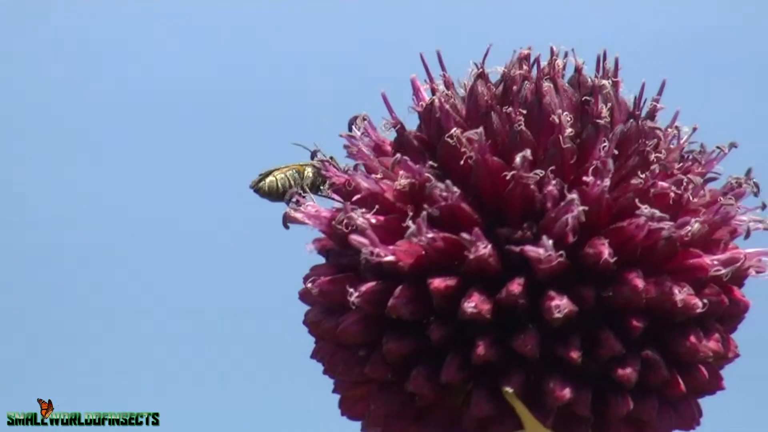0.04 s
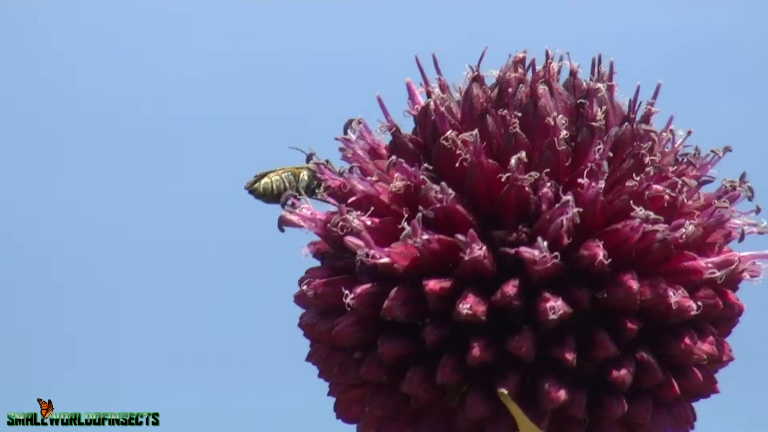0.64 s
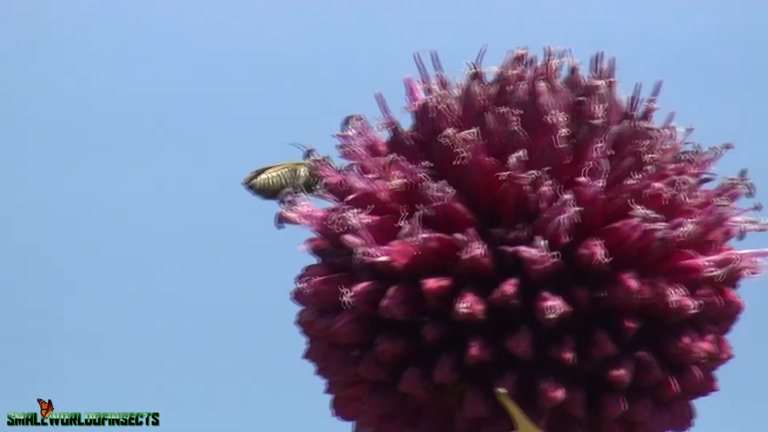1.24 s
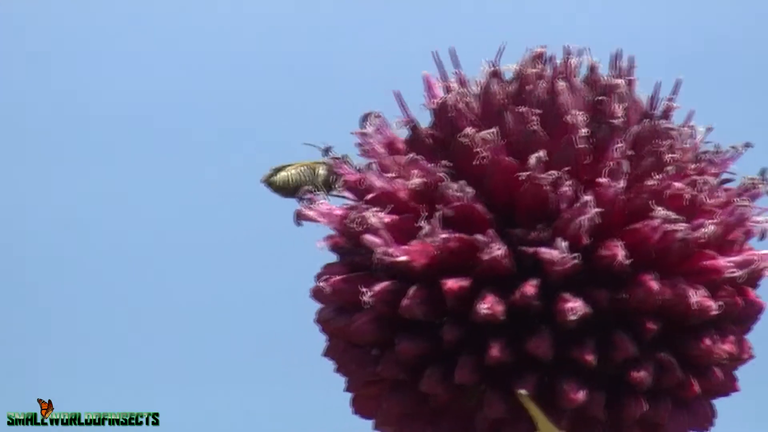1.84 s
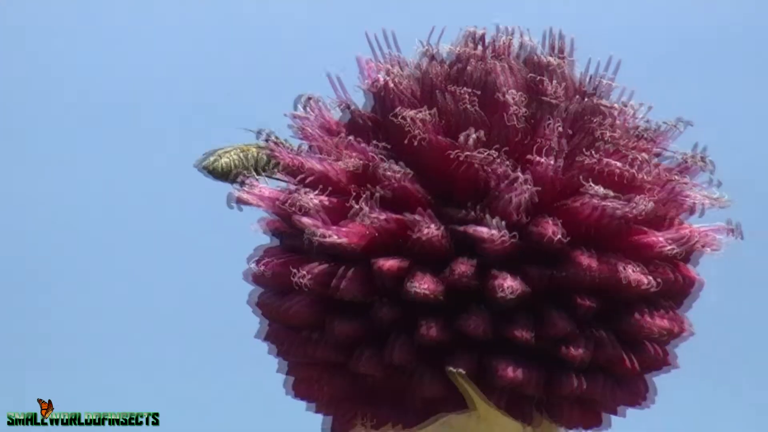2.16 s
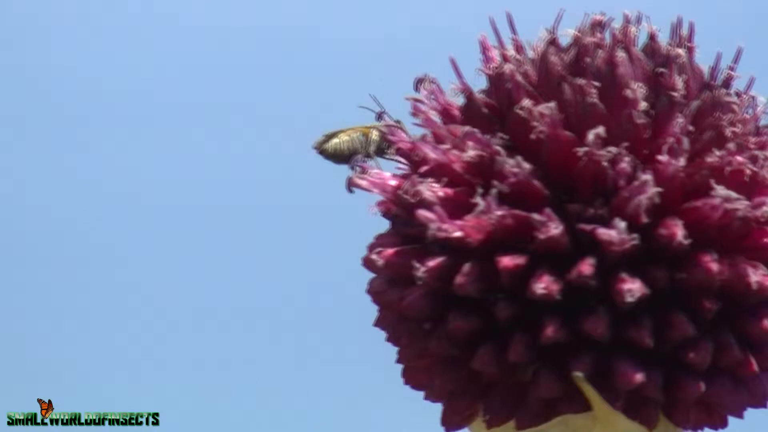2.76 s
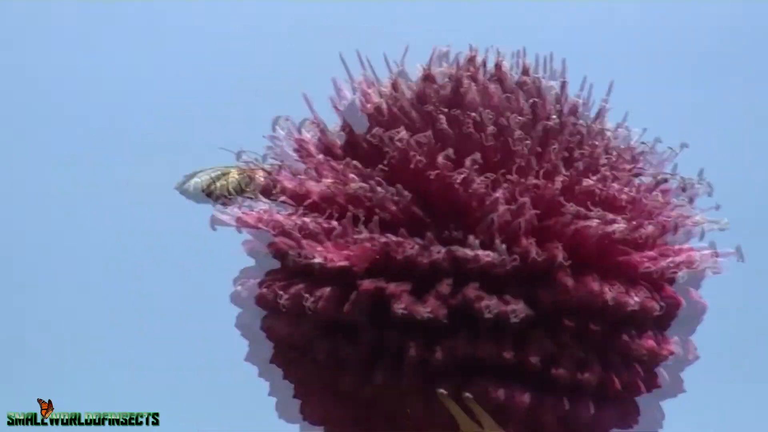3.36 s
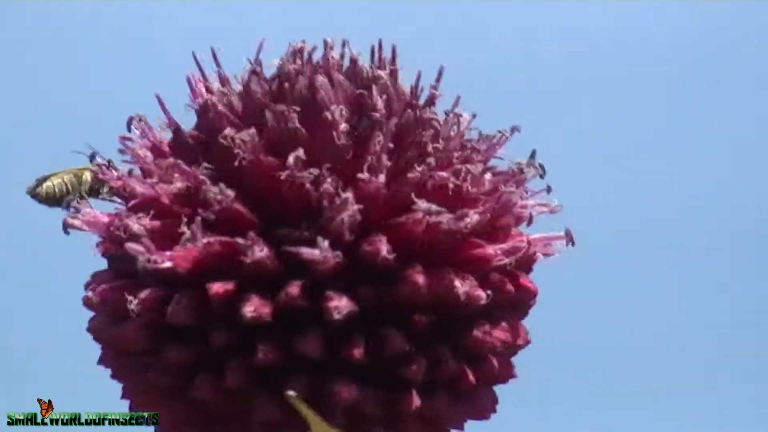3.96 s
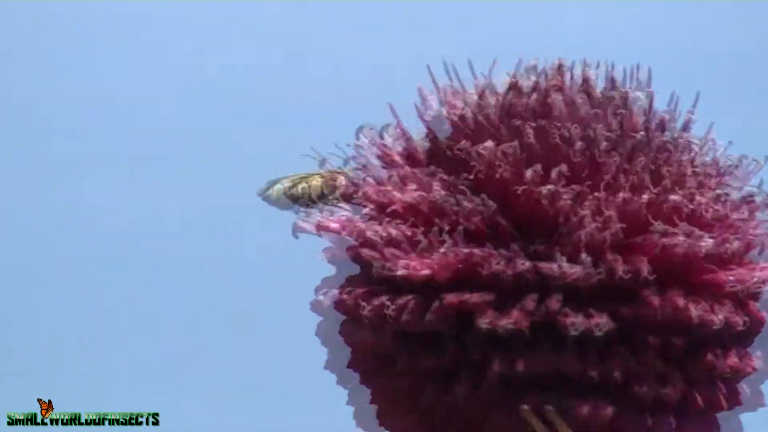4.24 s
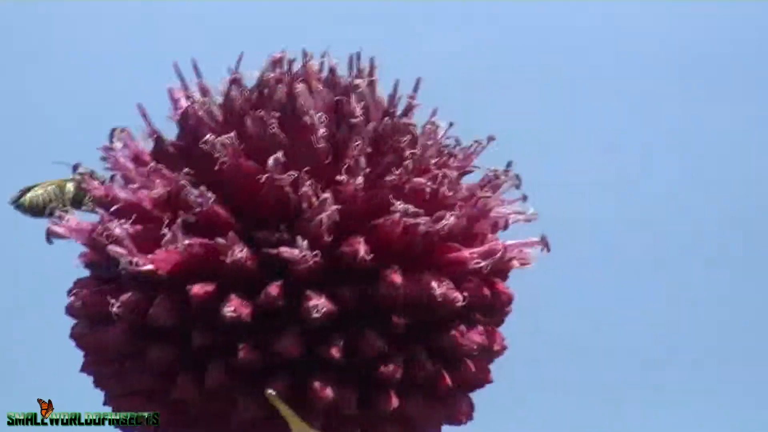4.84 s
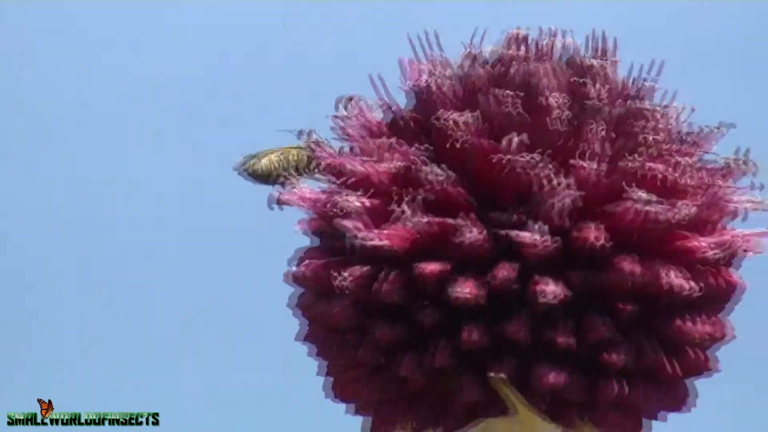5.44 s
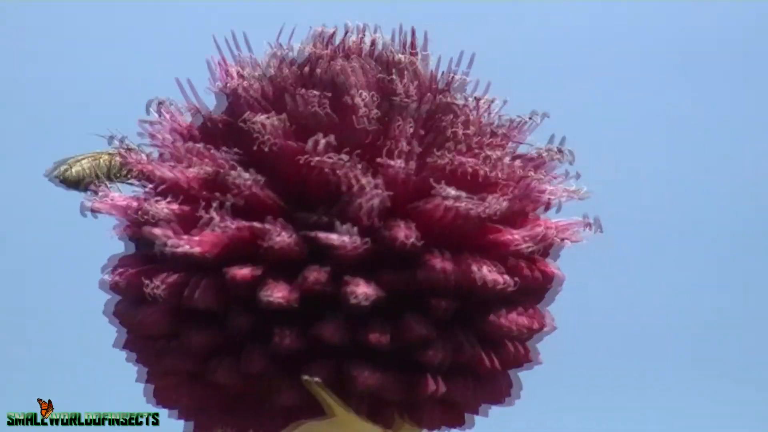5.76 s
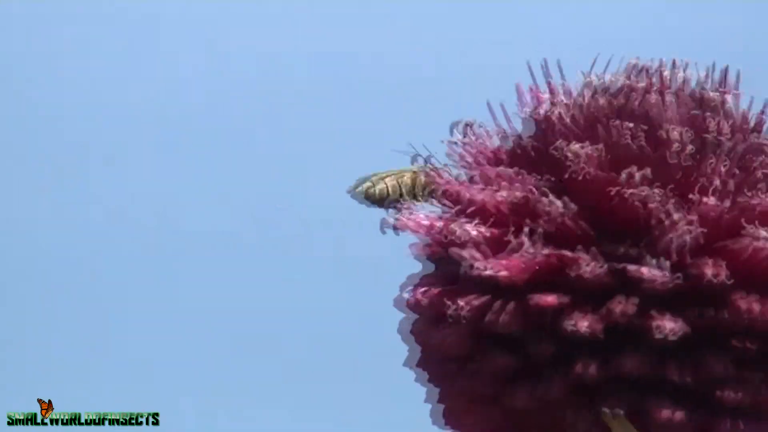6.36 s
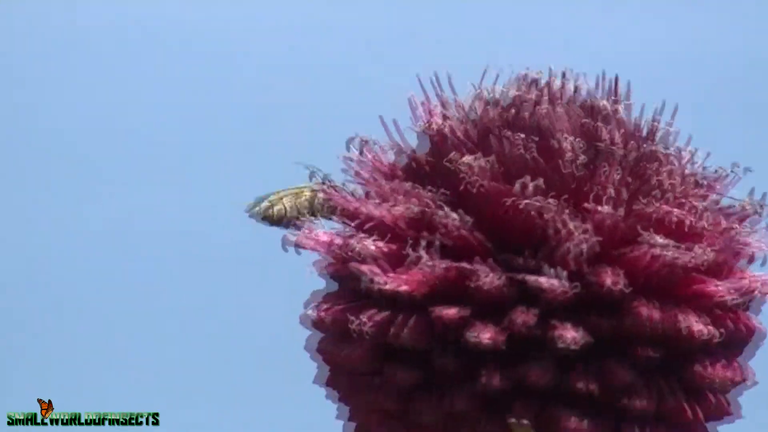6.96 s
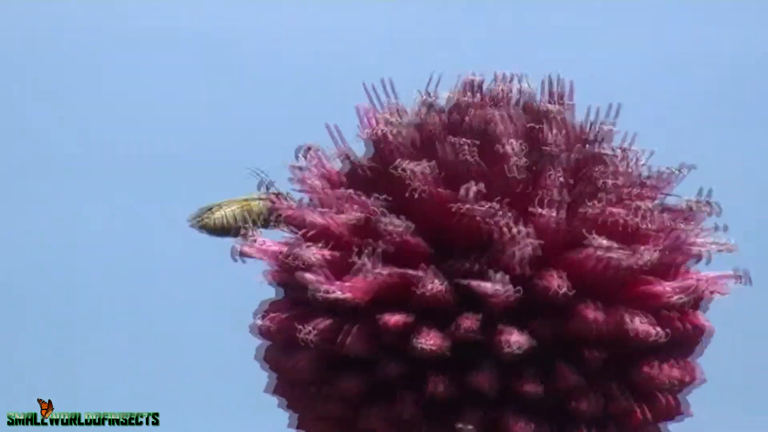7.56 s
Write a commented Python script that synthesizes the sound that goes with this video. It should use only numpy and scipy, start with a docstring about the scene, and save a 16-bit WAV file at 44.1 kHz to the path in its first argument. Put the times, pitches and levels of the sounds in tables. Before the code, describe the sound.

A camcorder's motor hums and ticks outdoors, soft wind rumbles on the microphone, then fingers knock and click sharply on the plastic body.

```python
"""Outdoors in a light breeze, on a tape camcorder's built-in stereo microphone, inches from its works.
The lens motor ticks for the first second; drive, hum and a thin whine run throughout, and leaves stir
faintly to the right. From 3 s gusts rumble on the two microphone ports, and at 5.3 s a small part snaps.
From 6.2 s fingers knock the body and click on the shell, loudest twice just after 7 s."""
import sys
import numpy as np
from scipy import signal
from scipy.fft import rfft, irfft, next_fast_len
from scipy.io import wavfile
from scipy.ndimage import uniform_filter1d

SR = 44100
rng = np.random.default_rng(int(sys.argv[2]) if len(sys.argv) > 2 else 0)


def master(y):
    """Save y as 16-bit WAV."""
    cut = np.clip(np.atleast_2d(y).T, -1, 1)
    pcm = np.round(cut * 32767)  # scale
    wavfile.write(sys.argv[1], SR, pcm.astype(np.int16))


N = 340011
T = np.arange(N) / SR
FFT_SIZE = next_fast_len(N + 8192)
F = np.maximum(np.arange(FFT_SIZE // 2 + 1) * SR / FFT_SIZE, 1e-3)

# Table levels are relative. pan_db is left minus right; lead_rad is the left port's phase lead.
# spectrum of the open air: frequency_hz, level_db
AIR_SPECTRUM = [(15, -47), (25, -12), (96, -1), (143, -4), (284, -5), (444, -10), (632, -22), (1090, -15.5),
                (1620, -21), (2010, -25), (2260, -19), (2930, -24.5), (7000, -32.5), (9100, -50),
                (15400, -120)]
# that air between the two ports: frequency_hz, pan_db, correlation
AIR_STEREO = [(40, -6, 0.51), (130, -7.5, 0.86), (273, -6.5, 0.79), (444, 1.5, -0.54), (1100, 0.5, -0.76),
              (2000, 11, 0.16), (3500, 0, -0.052), (12000, -8, 0.52)]
# leaves stirring: peak_s, level_db, rise_s, fall_s
RUSTLES = [(.1, -68, 0.17, 0.61), (1.02, -64, 0.056, 0.1), (1.36, -61, 0.054, 0.063),
           (1.6, -66.5, 0.42, 0.72), (6.37, -67, 0.074, 0.062)]
# wind rumble on the ports: frequency_hz, level_db
WIND_SPECTRUM = [(13, -36), (22, -8.5), (86, -3), (112, -6.5), (135, -2.5), (176, -10), (294, -14.5),
                 (332, -20.5), (520, -24), (680, -51), (1140, -120)]
# gusts: peak_s, level_db, rise_s, fall_s
GUSTS = [(3.11, -44, 0.031, .05), (3.197, -35, 0.019, 0.013), (3.28, -44, 0.038, 0.082),
         (3.75, -44.5, 0.041, 0.14), (4.12, -45, 0.069, 0.19), (4.4, -42, 0.02, .025),
         (5.14, -52, 0.048, 0.07), (5.33, -42, 0.12, 0.087), (5.44, -37.5, 0.061, 0.032),
         (5.51, -36, 0.032, 0.025), (5.615, -40.5, 0.035, 0.042), (5.78, -47, .08, .08),
         (6.21, -42.5, 0.047, 0.025), (6.29, -40, 0.036, 0.025), (6.332, -39, .008, 0.015),
         (6.51, -45.5, 0.11, 0.037), (6.73, -46.5, 0.073, 0.16), (7.12, -46.5, 0.11, 0.13)]
# swell and sag of the motor hum: time_s, level_db
HUM_LEVELS = [(.08, -75), (.24, -58.5), (.4, -62), (.77, -49.5), (1.07, -58), (1.28, -51.5), (1.58, -51),
              (1.95, -59.5), (2.3, -58), (2.66, -50), (3.0, -58.5), (3.4, -67), (3.65, -53), (4.5, -61.5),
              (4.9, -50), (5.75, -55), (7.48, -52.5), (7.71, -61)]
# partials of the hum: pitch_ratio, level_db
HUM_PARTIALS = [(1, 12), (2.004, -31), (3.33, -19)]
# housing resonances shaken by the tape drive: pitch_hz, width_hz, level_db, pan_db, lead_rad
HOUSING_MODES = [(176.6, 50, 1, -10, 1.36), (283.5, 38, -5, -13.5, 1.5), (591.6, 106, -5.5, -10, 1.65),
                 (672.4, 128, -5.5, -11, 2), (1308, 52, -12, -7.5, 4), (1609, 155, -14, -8, 0.9),
                 (2182, 73, -20.5, -18, 2), (2239, 72, -9, -9.5, 1.7), (2430, 59, -19, 22, 1.5),
                 (2572, 12.8, -3, -2.5, -1), (3260, 91, -17, 1, 2), (4930, 680, -24.5, -3, 3)]
# resonances of the plastic shell: pitch_hz, width_hz, level_db, pan_db, lead_rad
SHELL_MODES = [(437, 32, 9.5, -2, 1.44), (515, 134, 4, -10.5, 2), (645, 82, 4.5, -10, 7),
               (682, 88, 0.5, -7, 2), (844.4, 27, 8.5, -12, -2.5), (980, 21, -3.5, -7, -11),
               (1200, 18, -6.5, -3, 8), (1313, 107, 0, -0.5, 0.5), (1489, 132, -9.5, 28, 3),
               (1500, 71, -7, 20.5, -6), (1760, 95, -10, -2, -8.5), (2300, 67, -0.5, 4.5, 4),
               (2580, 70, -14.5, 18, 5), (2627, 130, -8, 10, 1), (3300, 360, -20, 23, -0.5),
               (3930, 830, -24, -1, 1.5)]
# resonances of the whole body on its mount: pitch_hz, width_hz, level_db, pan_db, lead_rad
BODY_MODES = [(183, 52, -1, 24.5, 2.5), (240, 52, 1.5, -8, 5), (406, 56, 0.5, -12.5, 3.5),
              (560, 78, -9.5, -7.5, 4), (631, 40, -5.5, 4, 5), (806, 46, -10.5, -11, -3.2),
              (992, 84, -14.5, -19, -6), (1200, 89, -9.5, -10, 4.5), (1300, 65, -18, -11, 4.5),
              (1710, 170, -23, -5, -2), (2060, 44, -14, 4, -3.5), (2670, 150, -13, 11, 3.5)]
# resonances of the small part that snaps: pitch_hz, width_hz, level_db, pan_db, lead_rad
SNAP_MODES = [(1050, 50, 10, -5, 8), (1580, 240, 1.5, 6, 1.5), (2350, 120, 7, 12, 2),
              (3040, 280, 7, 4, 1.5), (4300, 340, 8.5, -5, 3), (4950, 230, -3, -3, 0.5),
              (6200, 400, 4, -2.5, 3.5), (7830, 550, 0, -10, 0.5), (9800, 260, -10, -8, 3)]
# squeak as the lens motor runs up: time_s, level_db
SQUEAK_LEVELS = [(0, -83), (.03, -71), (.11, -72), (.15, -93)]
# lens motor steps, one a frame, mostly hard and soft in turn: start_s, level_db, brightness_hz
LENS_STEPS = [(.002, -26, 3200), (0.0438, -28.5, 1200), (0.0811, -26.5, 2800), (.123, -23.5, 3180),
              (0.162, -31.5, 1600), (.2031, -22, 4500), (0.2426, -31.5, 2000), (0.2821, -24.5, 4180),
              (0.3233, -29.5, 1000), (0.3623, -23.5, 4000), (0.4047, -33, 1200), (0.445, -31.5, 1900),
              (0.4824, -25, 2300), (0.524, -30.5, 2200), (0.5617, -26, 3800), (0.6032, -28, 1700),
              (0.6416, -25.5, 3200), (.685, -28.5, 1400), (.7219, -26.5, 3200), (0.7626, -23, 4000),
              (.8012, -32, 1800)]
# finger clicks: start_s, crack_db, low_hz, high_hz, t60_s, pan_db, shell_db,
# lower_ping_hz, lower_ping_db, upper_ping_hz, upper_ping_db, ping_pan_db
CLICKS = [(0.778, -50, 2150, 3100, 0.017, 9, -64, 2300, -43, 2800, -35, 8),
          (0.9166, -37, 1200, 8000, 0.016, -1, -37.5, 2780, -28, 3750, -38, 2),
          (6.8534, -20.5, 1200, 11200, 0.008, -6, -63, 1177, -32, 1800, -38, -7),
          (7.005, -46, 600, 1500, 0.019, -12, -40, 950, -52, 1500, -58, -12),
          (7.023, -41, 2500, 5000, 0.019, -4, -56, 3300, -47, 3700, -52, 0),
          (7.038, -4, 1200, 15400, 0.0088, -1.5, -21.5, 408, -20.5, 2170, -30, -4),
          (7.0415, -25.5, 3000, 13000, 0.014, 5, -47, 2500, -33, 5200, -27.5, -4),
          (7.0445, -27, 596, 4940, 0.024, -8, -22.5, 2290, -26, 3550, -37, 1),
          (7.0655, -38, 1500, 11000, 0.018, -3, -28, 1860, -42, 4230, -48, -3),
          (7.0715, -23, 1100, 7700, 0.012, -5, -38, 410, -26.5, 1820, -34, -6),
          (7.206, -19.5, 2190, 12000, 0.015, -2.5, -27, 1660, -18, 2300, -24, -7)]
# tone colour of the clicks' cracks: frequency_hz, level_db
CRACK_SPECTRUM = [(180, -38), (300, 6), (411, 19), (526, 10), (744, 7.5), (877, 0.5), (1800, -11),
                  (2200, -12), (2700, -14), (3280, -2), (4200, -8.5), (4800, -8.5), (5300, -9), (6790, -12),
                  (9000, -18), (15500, -26)]
# knocks on the body: start_s, level_db, brightness_hz, shell_over_body_db, low_cut_hz
KNOCKS = [(6.228, -32.5, 395, 15, 200), (6.241, -36.5, 400, -15, 240), (6.329, -36.5, 430, 5, 100),
          (6.402, -42.5, 400, -9, 150), (6.739, -36.5, 400, 4.5, 80), (7.038, -22, 750, -11, 200),
          (7.207, -4, 1930, -21.5, 110), (7.536, -15.5, 560, -15.5, 60)]


def undb(db):
    """Decibels to gain."""
    return 10 ** (np.asarray(db) / 20)


def level(x, db):
    """Scale to an rms level."""
    return x * undb(db) / np.sqrt(np.mean(x ** 2))


def curve(rows):
    """Join (time_s, value) rows by straight lines."""
    return np.interp(T, *np.transpose(rows))


def swells(rows, rest_db):
    """Level in dB of bell-shaped swells over a resting level."""
    power = undb(rest_db) ** 2
    for peak_s, db, rise_s, fall_s in rows:
        width_s = np.where(T < peak_s, rise_s, fall_s)
        power = power + undb(db) ** 2 * np.exp(-((T - peak_s) / width_s) ** 2)
    return 10 * np.log10(power)


def walk(rate_hz):
    """Random values held 1 / rate_hz seconds and smoothed twice; rms 1."""
    hold = int(SR / rate_hz)
    steps = np.repeat(rng.standard_normal(N // hold + 1), hold)
    return level(uniform_filter1d(uniform_filter1d(steps, hold), hold)[:N], 0)


def across(rows, column=1):
    """Join one column of a spectrum on a log-frequency axis."""
    rows = np.array(rows, float)
    return np.interp(np.log(F), np.log(rows[:, 0]), rows[:, column])


def shape(x, response):
    """Filter by a frequency response."""
    return irfft(rfft(x, FFT_SIZE) * response, FFT_SIZE)[..., :N]


def noise(response, channels=1):
    """Unrelated noises with one frequency response."""
    return shape(rng.standard_normal((channels, N)), response)


def edge(x, hz, kind, order=2):
    """High-pass or low-pass."""
    return signal.sosfilt(signal.butter(order, min(hz, .45 * SR), kind, fs=SR, output="sos"), x + 1e-18)


def whiten(burst, bins=13):
    """Even out a burst's spectrum, fade it and give it unit energy."""
    spectrum = rfft(burst)
    flat = irfft(spectrum / np.sqrt(uniform_filter1d(np.abs(spectrum) ** 2, bins)), len(burst))
    flat *= np.linspace(1, 0, len(burst))
    return flat / np.linalg.norm(flat)


def ports(pan_db):
    """Gains at the left and right microphone ports."""
    return undb(np.array([[pan_db], [-pan_db]]) / 2)


def mode_ports(pan_db, lead_rad):
    """A resonance reaches each port with its own strength and phase."""
    return ports(pan_db) * np.array([[np.exp(1j * lead_rad)], [1]])


def ring(modes, low_hz, order=3, size=4096):
    """One blow on a set of resonances, heard at both ports; peak 1, rolled off below low_hz."""
    f = np.arange(size // 2 + 1) * SR / size
    response = sum(undb(db) * mode_ports(pan, lead) * hz * width / (hz ** 2 - f ** 2 + 1j * f * width)
                   for hz, width, db, pan, lead in modes)
    blow = edge(irfft(response, size)[:, :size // 2], low_hz, "high", order)
    return blow / np.abs(blow).max()


def disperse(x, hz, relative_width):
    """Bending waves travel at unequal speeds, which smears a blow's first edge."""
    _, poles = signal.iirpeak(hz, 1 / relative_width, fs=SR)
    return signal.lfilter(poles[::-1], poles, x)


def add(out, start_s, sound):
    """Mix a short sound in at a time."""
    i = max(int(start_s * SR), 0)
    out[:, i:i + sound.shape[-1]] += sound[..., :N - i]


def open_air(air_db=-53, air_top_hz=7500, hiss_db=-65, hiss_hz=9000):
    """Open air and microphone hiss; the ports share the air's bass and oppose in its middle."""
    sides = np.array([[1], [-1]])
    gain = undb(across(AIR_SPECTRUM)) * undb(sides * across(AIR_STEREO) / 2)
    correlation = np.clip(across(AIR_STEREO, column=2), -1, 1)
    shared = noise(gain * np.sqrt(1 + correlation))
    opposed = sides * noise(gain * np.sqrt(1 - correlation))
    air = edge(shared + opposed, air_top_hz, "low")
    hiss = edge(noise(1 / (1 + (F / hiss_hz) ** 2), channels=2), 14900, "low", order=10)
    return level(air, air_db) + level(hiss, hiss_db)


def leaves(gain_db=-2, pan_db=-7, flicker_db=3.5):
    """Leaves rustle faintly off to the right."""
    rustle = edge(edge(noise(1, channels=2), 3260, "high"), 3500, "low")
    stir_db = swells(RUSTLES, rest_db=-76) + flicker_db * walk(40)
    return level(rustle, gain_db) * undb(stir_db) * ports(pan_db)


def wind(breeze_from_s=2.9, calm_db=-63.5, breeze_db=-53, strong_db=-44, buffet_db=2.5, eddy_db=-23):
    """After a calm start, gusts buffet the ports with a rumble and shed smaller, brighter eddies."""
    gust_db = swells(GUSTS, np.where(T < breeze_from_s, calm_db, breeze_db))
    force = undb(gust_db - strong_db + buffet_db * walk(28))
    rumble = edge(noise(undb(across(WIND_SPECTRUM)), channels=2), 44, "high", order=3)
    # pressure on one side of the housing is partly suction on the other
    rumble = level(rumble - 0.27 * rumble[::-1], 0)
    eddies = edge(noise(1, channels=2), 500, "low", order=4)
    eddies = level(edge(eddies, 240, "high"), eddy_db)
    return (rumble * force + eddies * force ** 0.99) * undb(strong_db) * ports(pan_db=-5)


def circuit_whine(line_hz=15625, frame_hz=25, line_db=-81, half_db=-71):
    """The picture circuit whines at its line rate and at half of it; the lower tone flips every frame."""
    flip = np.tanh(12 * np.sin(np.pi * frame_hz * T))
    half_tone = flip * np.sin(np.pi * line_hz * T)
    return level(half_tone, half_db) + level(np.sin(2 * np.pi * line_hz * T), line_db)


def motor_hum(pitch_hz=90.6, wander=0.0033, gain_db=-2, pan_db=-12):
    """The motor's low note swells and sags at a nearly steady pitch."""
    phase = 2 * np.pi * np.cumsum(pitch_hz * (1 + wander * walk(12))) / SR
    tone = sum(undb(db) * np.sin(ratio * phase) for ratio, db in HUM_PARTIALS)
    return level(tone, gain_db) * undb(curve(HUM_LEVELS)) * ports(pan_db)


def tape_drive(level_db=-51, flutter_db=1.0, swell_db=0.37):
    """Tape and gears rub unevenly and keep the housing ringing around the microphone."""
    spectrum = np.zeros((2, len(F)), complex)
    for hz, width_hz, mode_db, pan, lead in HOUSING_MODES:
        broad_hz = max(1.5 * width_hz, .06 * hz)
        near = np.abs(F - hz) < 10 * broad_hz
        resonance = 1 / (1 + 1j * (F[near] ** 2 - hz ** 2) / (F[near] * broad_hz)) ** 2
        friction = rng.standard_normal(2 * len(F)).view(complex)[near]
        gain = undb(mode_db) * np.sqrt(width_hz / broad_hz)
        spectrum[:, near] += friction * gain * resonance * mode_ports(pan, lead)
    whirr = level(irfft(spectrum, FFT_SIZE)[:, :N], level_db)
    return whirr * undb(flutter_db * walk(30) + swell_db * walk(4.83))


def lens_squeak(pitch_hz=9300, width_hz=650, pan_db=-9):
    """The lens gears sing briefly in a narrow high band."""
    band = noise(1 / (1 + ((F - pitch_hz) / width_hz) ** 2))
    return level(band, 0) * undb(curve(SQUEAK_LEVELS)) * ports(pan_db)


def lens_motor(gain_db=2, grit_db=-6.5, grit_t60_s=0.058, detune=0.01, colour_db=1.5, size=2048):
    """Each step meets a new gear tooth: a tap with its own mix of shell modes, a scrape, a body nudge."""
    out, t = np.zeros((2, N)), np.arange(size) / SR
    nudge = undb(-21) * edge(ring(BODY_MODES, low_hz=110), 300, "low")
    for start_s, step_db, brightness_hz in LENS_STEPS:
        scatter = rng.standard_normal((len(SHELL_MODES), 2))
        modes = [(hz * (1 + detune * sharper), width, db + colour_db * louder, pan, lead)
                 for (hz, width, db, pan, lead), (sharper, louder) in zip(SHELL_MODES, scatter)]
        shell = disperse(ring(modes, low_hz=420, order=6), hz=1000, relative_width=0.54)
        scrape = rng.standard_normal(size) * undb(-60 * t / grit_t60_s)
        push = edge((t == 0) + undb(grit_db) * scrape / np.linalg.norm(scrape), brightness_hz, "low")
        tap = signal.fftconvolve(shell + nudge, push[None], axes=1)
        add(out, start_s, undb(step_db + gain_db) * tap / np.abs(tap).max())
    return edge(out, 4500, "low", order=4)


def finger_slide(peak_s=8.0, peak_db=-62, rise_s=0.1, fall_s=0.16, grain_db=4):
    """A finger barely starts to slide on the shell; the scene ends before the swell peaks."""
    friction = edge(edge(noise(1, channels=2), 2000, "high"), 6000, "low")
    slide = level(friction * undb(grain_db * walk(200)), 0)
    return slide * undb(swells([(peak_s, peak_db, rise_s, fall_s)], -np.inf))


def part_snap(start_s=5.3474, gain_db=-11.5, chatter_db=2, t60_s=0.028, rise_s=0.0013, size=2048):
    """A small stiff part lets go with one dry snap; a brief chatter swells and dies after it."""
    out, t = np.zeros((2, N)), np.arange(size) / SR
    chatter = rng.standard_normal(size) * undb(-60 * t / t60_s) * (1 - np.exp(-t / rise_s))
    push = (t == 0) + undb(chatter_db) * whiten(chatter)
    part = disperse(ring(SNAP_MODES, low_hz=940, order=6), hz=3000, relative_width=0.35)
    snap = signal.fftconvolve(part, push[None], axes=1)
    add(out, start_s, undb(gain_db) * edge(snap, 10500, "low", order=8))
    return out


def finger_clicks(shell, rise_s=0.00098, ping_t60_s=0.036, size=8192):
    """Plastic parts slip under a finger: a dense crack, two pings of the part, a short shell ring."""
    cracks, rings, t = np.zeros((2, N)), np.zeros((2, N)), np.arange(size) / SR
    attack = 1 - np.exp(-t / rise_s)
    for (start_s, crack_db, low_hz, high_hz, t60_s, pan_db, shell_db,
         lower_hz, lower_db, upper_hz, upper_db, ping_pan_db) in CLICKS:
        crack = edge(rng.standard_normal((2, size)), low_hz, "high", order=3)
        crack = level(edge(crack, high_hz, "low", order=4), crack_db)
        add(cracks, start_s, crack * undb(-60 * t / t60_s) * attack * ports(pan_db))
        for hz, ping_db in ((lower_hz, lower_db), (upper_hz, upper_db)):
            ping = np.imag(mode_ports(ping_pan_db, lead_rad=1.8) * np.exp(2j * np.pi * hz * t))
            ring_s = ping_t60_s * np.sqrt(1000 / hz)  # ping_t60_s holds at 1 kHz; higher dies sooner
            add(rings, start_s, ping * undb(ping_db - 60 * t / ring_s) * attack)
        add(rings, start_s, undb(shell_db) * shell)
    colour = undb(across(CRACK_SPECTRUM))
    colour /= colour[(F > 1000) & (F < 8000)].mean()
    return shape(cracks, colour) + rings


def body_knocks(shell, gain_db=2):
    """The body thuds on its mount and the shell sounds with it; softer contacts leave the low modes."""
    out, body = np.zeros((2, N)), ring(BODY_MODES, low_hz=152)
    for start_s, knock_db, brightness_hz, shell_db, low_cut_hz in KNOCKS:
        blow = disperse(body + undb(shell_db) * shell, hz=1100, relative_width=0.63)
        thud = edge(edge(blow, brightness_hz, "low"), low_cut_hz, "high")
        add(out, start_s, undb(knock_db + gain_db) * thud / np.abs(thud).max())
    return out


def scene():
    """The camera's works, the hand on it and the outdoors, as they reach the two ports."""
    shell = ring(SHELL_MODES, low_hz=410)
    works = tape_drive() + motor_hum() + circuit_whine() + lens_motor() + lens_squeak()
    handling = finger_clicks(shell) + part_snap() + finger_slide() + body_knocks(shell)
    outdoors = open_air() + wind() + leaves()
    return works + handling + outdoors


def record(dry, top_hz=15900):
    """The recorder rounds the loudest peaks and cuts the top."""
    return signal.sosfilt(signal.ellip(10, .1, 70, top_hz, fs=SR, output="sos"), np.tanh(dry))


dry = scene()
out = record(dry)
master(out)
```